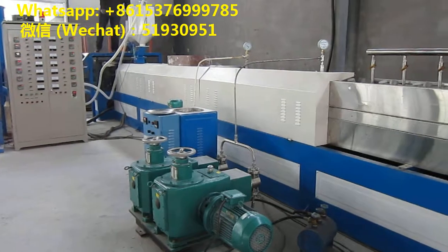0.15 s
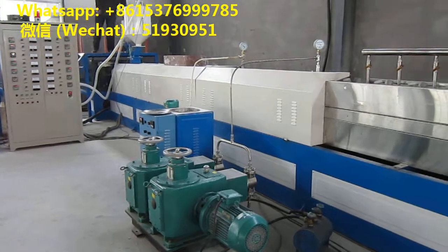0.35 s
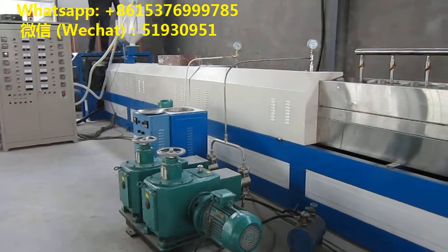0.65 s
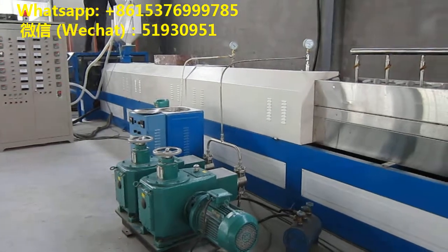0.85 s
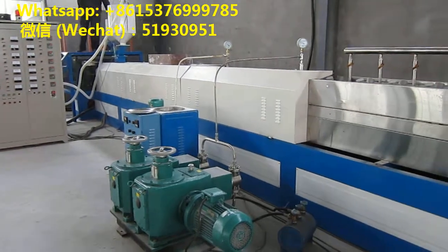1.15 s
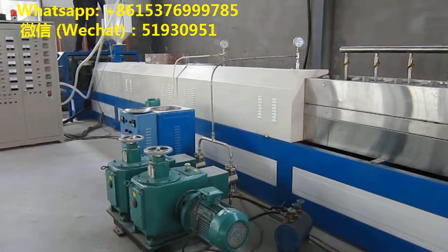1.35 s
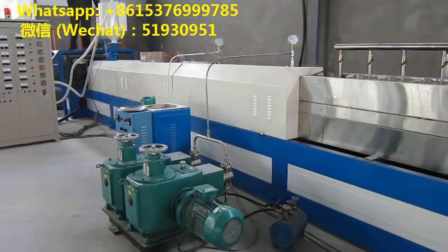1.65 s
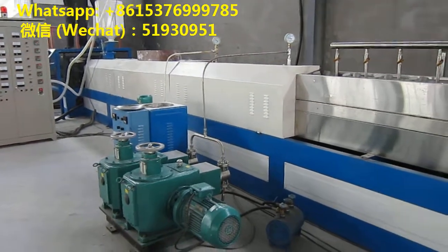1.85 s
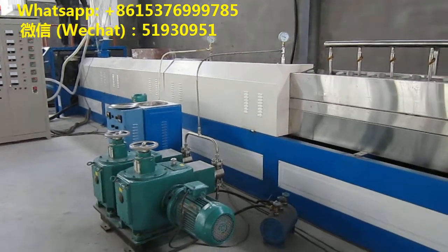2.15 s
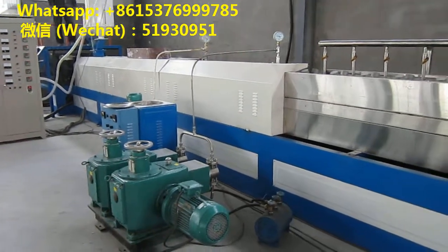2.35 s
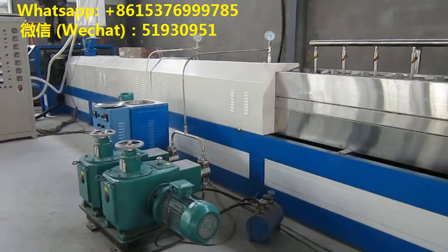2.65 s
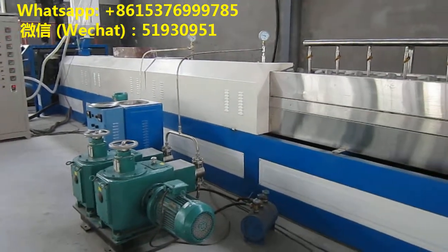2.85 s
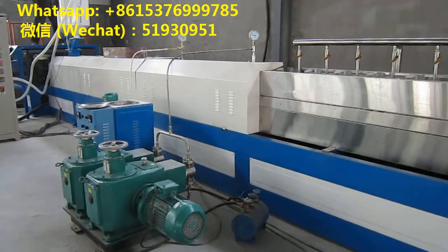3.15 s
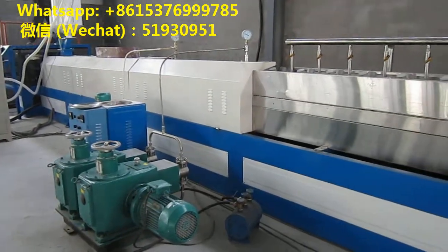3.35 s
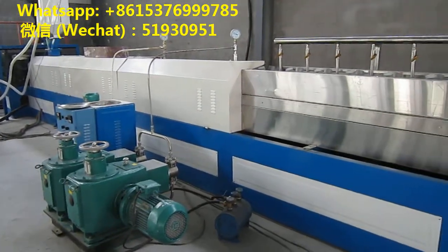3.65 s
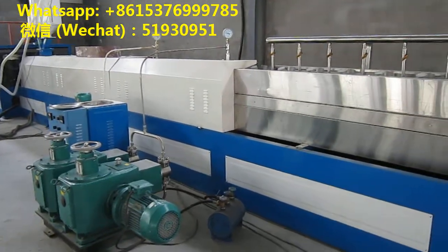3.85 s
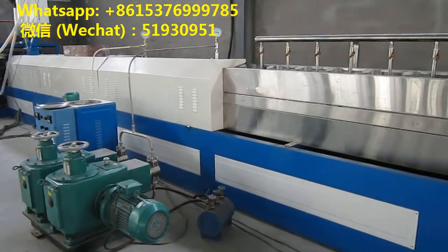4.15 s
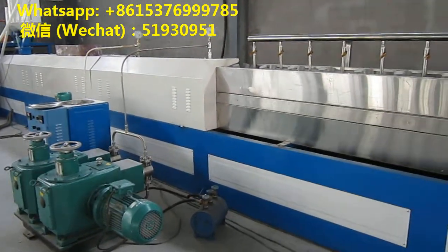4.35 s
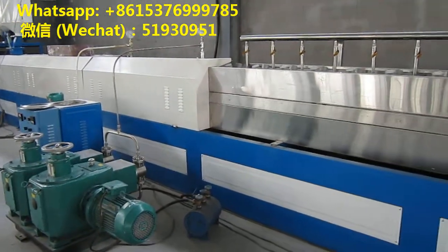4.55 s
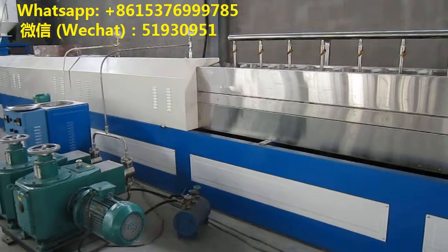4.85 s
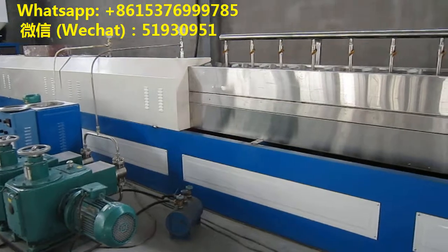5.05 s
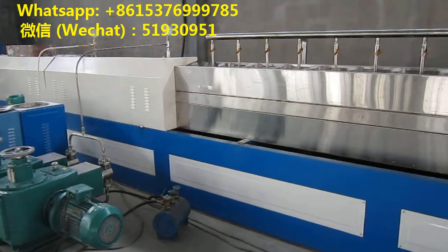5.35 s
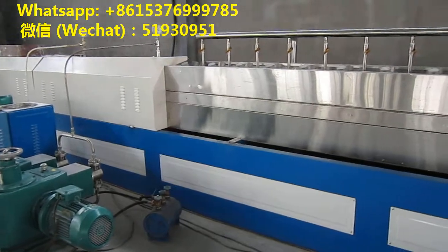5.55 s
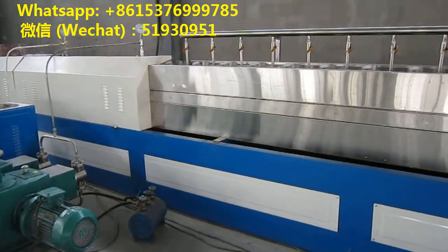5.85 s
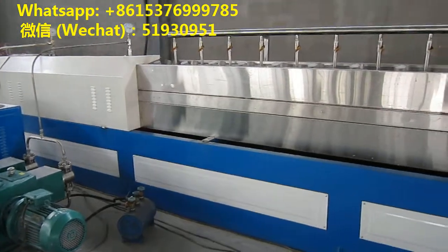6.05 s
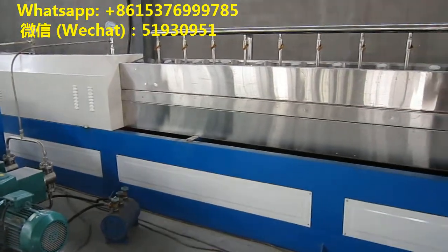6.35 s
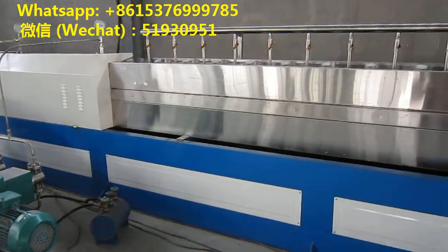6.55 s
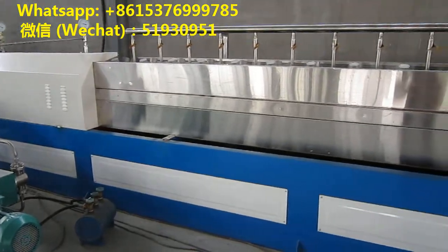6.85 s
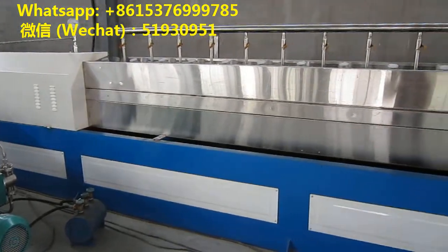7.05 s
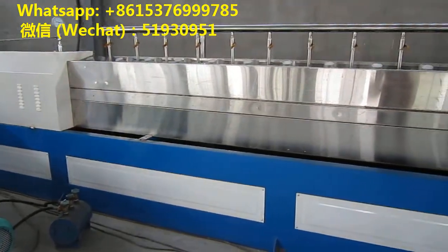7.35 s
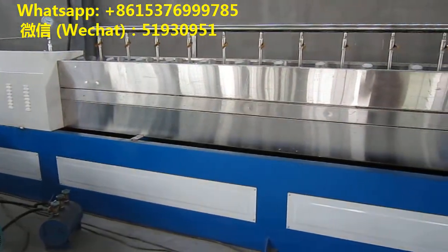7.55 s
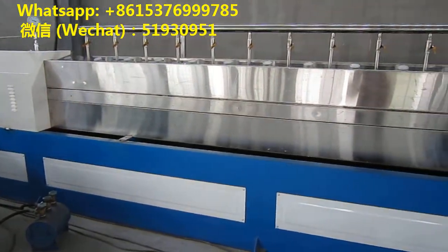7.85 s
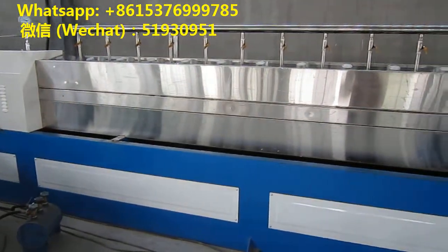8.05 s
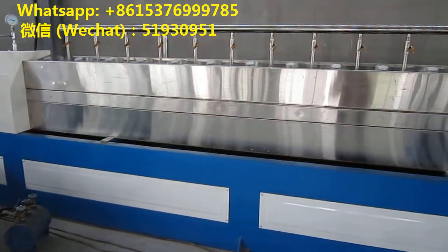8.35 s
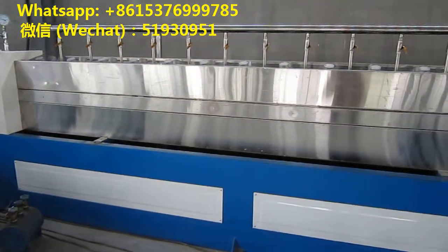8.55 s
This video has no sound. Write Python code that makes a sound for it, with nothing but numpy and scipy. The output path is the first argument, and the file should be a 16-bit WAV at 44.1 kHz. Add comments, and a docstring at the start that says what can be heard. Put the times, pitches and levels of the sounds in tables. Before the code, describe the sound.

A factory extrusion machine runs steadily, with fan roar, hiss, motor hum and high, wavering whining tones.

```python
"""A foam extrusion line runs in a hard-walled workshop while the microphone pans slowly along it.
From the start, cooling fans lay a bed of roar and hiss, shafts and gears hum, and the inverter makes
the motor whine near 3 kHz. Each tone swells and fades as the microphone crosses its standing waves.
Along the way the gear chord grows and the hiss dulls. Just after 6 s something squeals faintly
and dies away, and the line runs on."""
import sys
import numpy as np
from scipy import signal
from scipy.fft import rfft, irfft
from scipy.io import wavfile

SR = 44100
rng = np.random.default_rng(int(sys.argv[2]) if len(sys.argv) > 2 else 0)


def pcm_store(signal):
    """Save signal as 16-bit PCM."""
    levels = np.round(np.clip(np.atleast_2d(signal), -1, 1) * 32767)
    wavfile.write(sys.argv[1], SR, levels.astype(np.int16).T)


N = 383669
TIME = np.arange(N) / SR

# base spectra of the fans' roar and the cooling air's hiss: f/Hz, density/(dB per Hz)
ROAR_SPECTRUM = [(26, -99), (46, -79), (75, -64), (115, -63), (165, -57), (250, -53), (380, -53.5),
                 (470, -54.5), (515, -58.5), (700, -57), (860, -58.5), (950, -61), (1500, -64.5),
                 (3000, -83)]
HISS_SPECTRUM = [(400, -79), (1500, -67.5), (3000, -68.5), (4000, -70.5), (5000, -72.5), (5750, -75),
                 (6350, -82), (6800, -87.5), (7100, -100)]
# frame and housings, rung by the air stream: f/Hz, width/Hz, base peak density/(dB per Hz)
HOUSING_MODES = [(144.5, 14, -54), (336.7, 30, -52.5), (384, 14, -56), (254.4, 13, -56), (197, 13, -57),
                 (1732, 80, -66), (2324, 200, -68.5), (2447, 30, -68), (2990, 160, -68.5)]
# gain rides over the pan, a row each for roar, hiss and hiss treble: before/dB, after/dB
AIR_RIDES = [(-1, 0.5), (-0.5, 1), (0.94, -3.8)]
# brief swells and dips in the roar: t/s, half width/s, gain/dB
ROAR_SWELLS = [(.77, .05, -2), (1.05, .05, 1.2), (1.23, .08, -1.6), (3.75, .04, 1.8), (5.3, .13, 1.7),
               (6.25, .12, 1.2), (6.78, .08, 1.3), (7.06, .07, -2.8), (7.55, .13, 1), (8.17, .12, -1.2),
               (8.55, .1, 1)]

# hum of the main motor: multiple of the shaft speed, level/dB
SHAFT_HUM = [(2, -60), (3, -52), (4, -49), (6, -50.5), (10, -42.5), (14, -48), (16, -46), (20, -48),
             (48, -54)]
# faint, steady drive tones: f/Hz, level/dB
FAINT_DRIVE_TONES = [(826.3, -49.5), (932.5, -54), (1083.4, -52), (1440, -55), (1722.7, -56), (1773, -56),
                     (2226.7, -56), (2378.7, -58), (2421, -58), (2666, -59), (2872, -60), (3073, -60),
                     (3627, -59), (4000.5, -60), (4180, -63), (4400, -63), (4440, -63), (4480, -59),
                     (4520, -63), (4560, -61), (6000, -68)]
# clearer drive tones that come and go along the pan: f/Hz, envelope of (t/s, level/dB)
CLEAR_DRIVE_TONES = [ (1649.3, [(1.3, -51), (3.4, -60), (4, -50), (6.8, -46.5), (8.5, -49)]),
                     (2106.9, [(1.4, -54), (4.4, -51.5), (5.4, -48.5), (8, -47)]), (3849, [(2.1, -56),
                     (4.5, -68), (5.5, -53), (6.4, -62), (7.4, -51), (8.5, -48.5)]), (4150.5, [(0.2, -49.5),
                     (0.85, -52), (1.3, -63), (4.2, -60), (4.8, -50), (5.6, -59)]), (4600, [(0.4, -52),
                     (2.4, -67), (3.6, -54), (5.3, -62), (6.7, -53), (8.5, -59)])]
# gear mesh tones, whose close pairs beat: f/Hz, envelope of (t/s, level/dB)
MESH_TONES = [ (580.8, [(0.2, -40.5), (0.8, -44), (2.2, -42.5), (2.6, -39), (4.2, -37.5), (5.5, -33.7),
              (8.7, -33)]), (587.5, [(1.4, -44), (8.7, -47)]), (774.5, [(1.9, -44.5), (3.2, -38.3),
              (3.9, -38), (4.5, -40.5), (5.7, -39), (7.2, -41), (8, -39.5)]), (874.6, [(0, -49), (1.8, -47),
              (2.7, -42), (3.7, -42), (4.4, -38.5), (5.1, -40), (8.7, -39.7)]), (883.5, [(0.4, -44),
              (7.6, -48)])]

# the inverter's switching tone and the near sidebands below and above it: t/s, level/dB
CARRIER_ENVELOPE = [(0, -45), (0.7, -38.7), (1.1, -38), (1.35, -39.5), (1.7, -35.7), (2.15, -36),
                    (2.5, -43), (2.85, -43.5), (3.3, -51), (3.6, -42), (4.2, -48), (4.4, -42), (4.7, -45.5),
                    (5, -40.5), (5.4, -40.5), (5.85, -37.3), (6.25, -36.3), (6.5, -37.8), (8.05, -35.8),
                    (8.7, -41)]
NEAR_LOW_ENVELOPE = [(0, -46), (0.35, -45), (0.9, -36), (1.8, -33.7), (2.35, -36.5), (2.9, -52),
                     (3.45, -41), (4.4, -46), (4.9, -53), (5.7, -47), (6.2, -58), (6.8, -46), (8.1, -43),
                     (8.7, -39.5)]
NEAR_HIGH_ENVELOPE = [(1.1, -41), (1.5, -48.5), (2.2, -52), (2.9, -47), (3.3, -48), (3.7, -43.3),
                      (4.6, -45.5), (5.3, -43), (5.8, -46), (6.2, -41.3), (7, -47), (7.6, -47),
                      (8.3, -40.5)]
# its far sidebands, a second whine near 2.3 kHz and a thin whistle near 3.7 kHz: t/s, level/dB
FAR_LOW_ENVELOPE = [(0.15, -44), (0.6, -49), (1.25, -57), (1.75, -43), (2.05, -47.5), (2.6, -41.5),
                    (3.15, -37.3), (3.6, -41), (3.9, -39.3), (4.4, -42), (4.7, -51), (5.7, -52), (7.4, -48),
                    (8.55, -41.5)]
FAR_HIGH_ENVELOPE = [(0, -45), (0.9, -46), (1.8, -41.5), (2.15, -45), (2.4, -58), (3.3, -56), (4, -47.5),
                     (4.7, -58), (6.3, -54), (7.3, -64)]
# texture of the whine: t/s, throb (0 = smooth warble, 1 = full throb)
WHINE_THROB = [(1.35, .07), (1.9, .75), (3.5, .8), (3.8, .05), (4.6, .3), (5.1, .9), (6.3, 1), (6.7, .2),
               (8.1, .45), (8.6, .1)]


def amp(db):
    """Decibels to gain."""
    return 10 ** (np.asarray(db) / 20)


def spectrum_gain(points, hz):
    """A spectrum table as gain at hz, interpolated on a log-frequency axis."""
    f, db = np.transpose(points)
    return amp(np.interp(np.log(hz + 1), np.log(f + 1), db))


def envelope(points):
    """Straight ramps between (time, value) breakpoints, sample by sample."""
    return np.interp(TIME, *np.transpose(points))


def drift(top_hz):
    """Smooth random modulation of rms 1: sines spread over the decade below top_hz."""
    t = np.linspace(0, N / SR, 2000)
    rates = top_hz * np.geomspace(.1, 1, 24)
    wander = sum(np.sin(2 * np.pi * (hz * t + rng.random())) for hz in rates)
    return np.interp(TIME, t, wander / np.sqrt(np.mean(wander ** 2)))


def panned(before, after, middle_s=5.2, length_s=7.3):
    """Eases from one value to another as the microphone pans along the line."""
    progress = np.clip((TIME - middle_s) / length_s + .5, 0, 1)
    return before + (after - before) * np.sin(np.pi / 2 * progress) ** 2


def noise(density):
    """Noise whose amplitude per root Hz is density(f)."""
    hz = np.fft.rfftfreq(N, 1 / SR)
    return irfft(rfft(rng.standard_normal(N)) * density(hz) * np.sqrt(SR / 2), N)


def tone(hz, db, sway_rad, flutter):
    """A sine around rms level db; shifting echo paths sway its phase and flutter its level."""
    phase = 2 * np.pi * (hz * TIME + rng.random()) + sway_rad * drift(0.806)
    return np.sqrt(2) * amp(db) * (1 + flutter * drift(12)) * np.sin(phase)


def fans(churn_db=0.12, flicker_db=0.87, pulse_hz=7, pulse_db=0.34, treble_hz=4700):
    """Turbulent air: a churning roar, ringing housings, and hiss that dulls as the mic turns away."""
    roar_db, hiss_db, treble_db = [panned(before, after) for before, after in AIR_RIDES]
    swell_db = sum(db * np.exp(-((TIME - s) / width) ** 2) for s, width, db in ROAR_SWELLS)
    roar = noise(lambda hz: spectrum_gain(ROAR_SPECTRUM, hz) / (1 + (hz / 4000) ** 4))
    ring = noise(lambda hz: sum(amp(db) / (1 + (2 * (hz - f) / width) ** 2)
                                for f, width, db in HOUSING_MODES))
    body = (roar + ring) * amp(roar_db + swell_db + churn_db * drift(14))
    hiss = noise(lambda hz: spectrum_gain(HISS_SPECTRUM, hz))
    treble = signal.sosfiltfilt(signal.butter(2, treble_hz, "high", fs=SR, output="sos"), hiss)
    hiss += (amp(treble_db) - 1) * treble  # high shelf riding the pan
    hiss *= amp(hiss_db + flicker_db * drift(30))
    pulse = np.sin(2 * np.pi * pulse_hz * TIME + drift(.8))  # a slowly turning part pulses the air
    return (body + hiss) * amp(pulse_db * pulse)


def motors(shaft_hz=24.2, sway_rad=0.94, flutter=0.12, fade_db=2.0):
    """Shaft hum and thin drive tones, each fading in and out with the room's standing waves."""
    partials = [(order * shaft_hz, db) for order, db in SHAFT_HUM] + FAINT_DRIVE_TONES
    hum = sum(tone(hz, db + fade_db * drift(1.2), sway_rad, flutter) for hz, db in partials)
    singing = sum(tone(hz, envelope(level), sway_rad, flutter) for hz, level in CLEAR_DRIVE_TONES)
    return hum + singing


def gearboxes(sway_rad=0.4, flutter=0.058, fade_db=0.5):
    """Meshing teeth hold a gently beating midrange chord that grows along the pan."""
    return sum(tone(hz, envelope(level) + fade_db * drift(1.2), sway_rad, flutter)
               for hz, level in MESH_TONES)


def inverter(carrier_hz=3000, near_hz=40, far_hz=2000 / 3, sway_rad=0.27):
    """The switching tone sings in the motor iron, and its near sidebands beat against it."""
    partials = [(-near_hz, NEAR_LOW_ENVELOPE), (0, CARRIER_ENVELOPE), (near_hz, NEAR_HIGH_ENVELOPE),
                (-far_hz, FAR_LOW_ENVELOPE), (far_hz, FAR_HIGH_ENVELOPE)]
    # sidebands in step with the carrier make it throb; a quarter turn off, it warbles
    sideband_shift = np.pi / 2 * (1 - envelope(WHINE_THROB))
    path_phase = sway_rad * drift(.8)  # all partials share one moving path to the microphone
    whine = np.zeros(N)
    for offset_hz, level in partials:
        shift = sideband_shift if offset_hz else 0
        phase = 2 * np.pi * (carrier_hz + offset_hz) * TIME + shift + path_phase
        whine += np.sqrt(2) * amp(envelope(level)) * np.sin(phase)
    return whine


def squeal(start_s=6.2, attack_s=0.27, decay_s=0.38, peak_db=-36.5,
           settled_hz=1230, slide_hz=150, waver_hz=7):
    """Something rubs briefly: a thin, unsteady tone swells while sliding down, then dies away."""
    age = TIME - start_s
    attack = np.clip(age / attack_s, 0, 1)
    tail = np.exp(-np.maximum(age - attack_s, 0) / decay_s)
    hz = settled_hz + slide_hz * (1 - attack) ** 2 + waver_hz * drift(30)
    phase = 2 * np.pi * np.cumsum(hz) / SR
    return np.sqrt(2) * amp(peak_db) * attack ** 2 * tail * np.sin(phase)


def scene():
    """The running machinery and the one squeal, mixed in mono."""
    return (fans() + motors() + gearboxes() + inverter() + squeal())[None]


def record(dry):
    """A steep high cut takes off everything above about 7.1 kHz."""
    lowpass = signal.firwin(1023, cutoff=7130, window=("kaiser", 9), fs=SR)
    return signal.oaconvolve(dry, lowpass[None], "same")


dry = scene()
out = record(dry)
pcm_store(out)
```